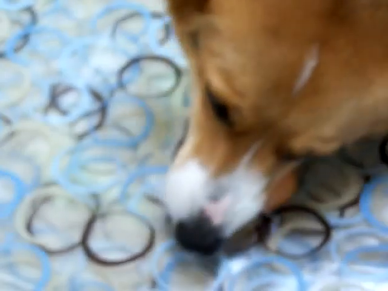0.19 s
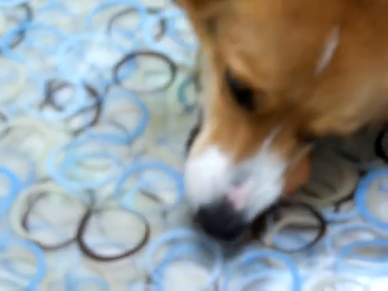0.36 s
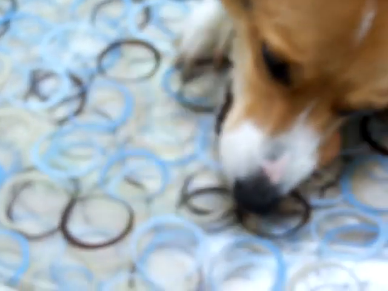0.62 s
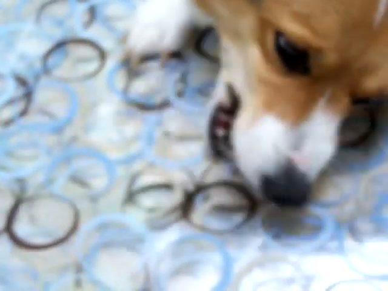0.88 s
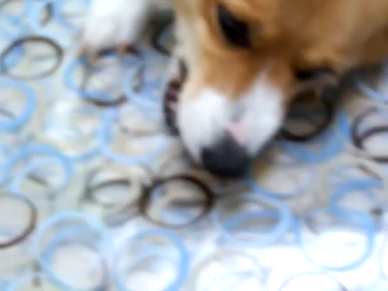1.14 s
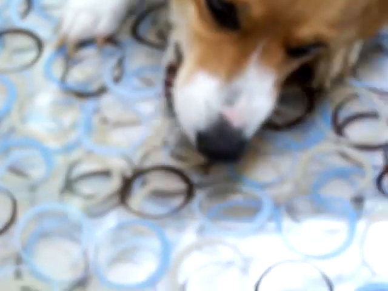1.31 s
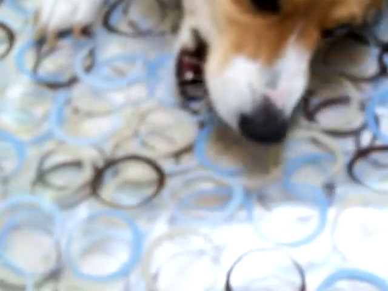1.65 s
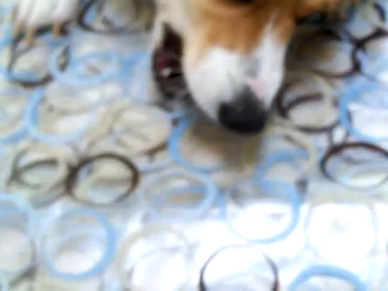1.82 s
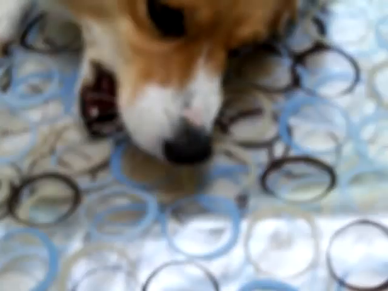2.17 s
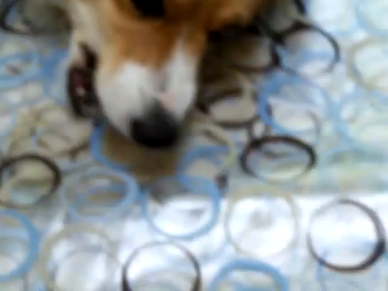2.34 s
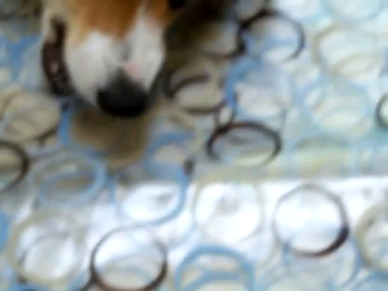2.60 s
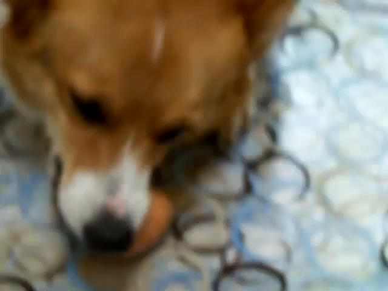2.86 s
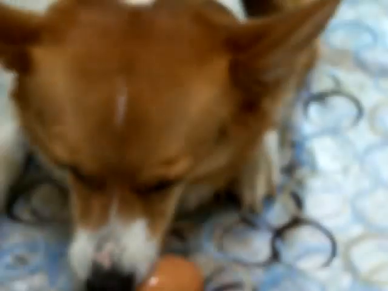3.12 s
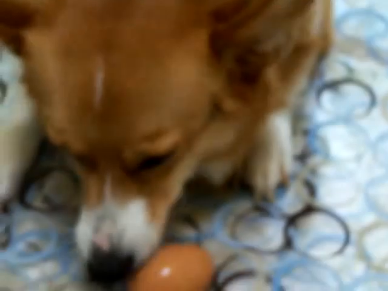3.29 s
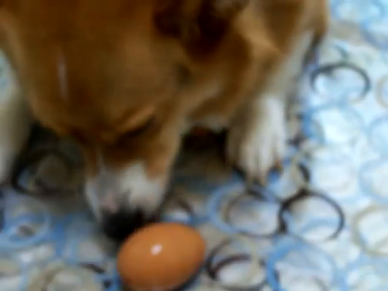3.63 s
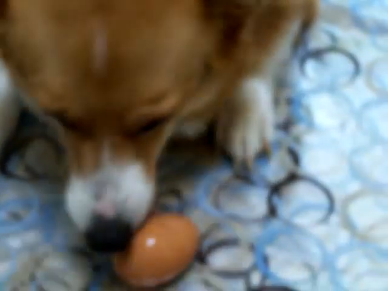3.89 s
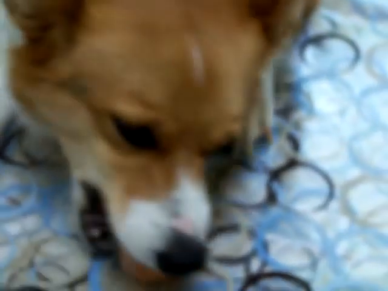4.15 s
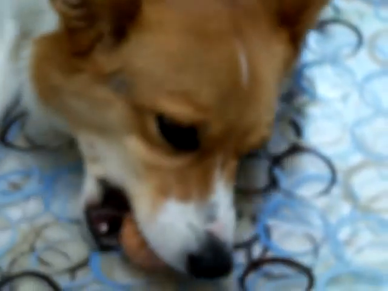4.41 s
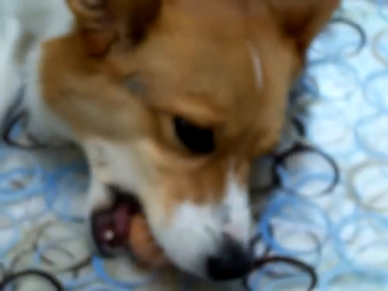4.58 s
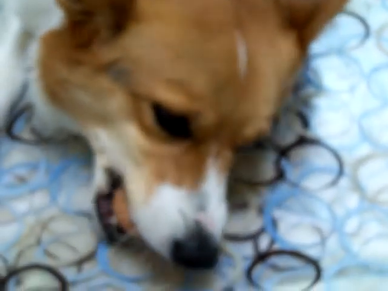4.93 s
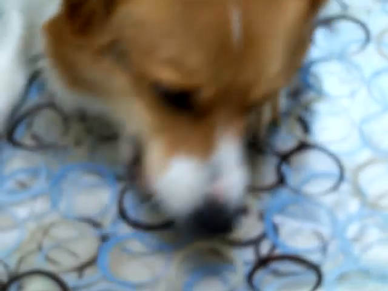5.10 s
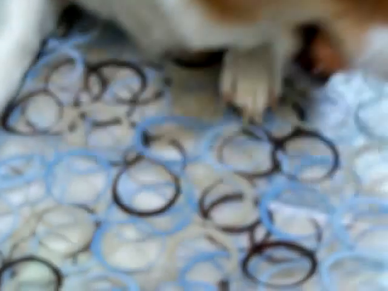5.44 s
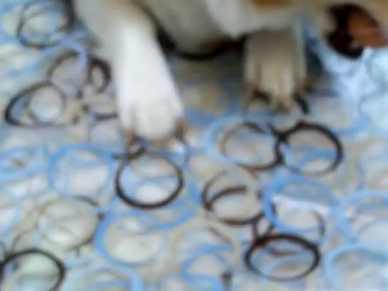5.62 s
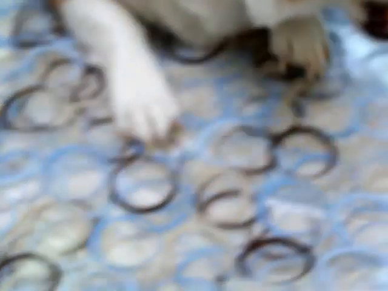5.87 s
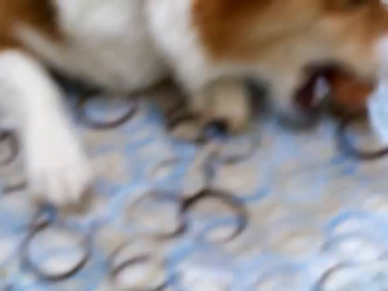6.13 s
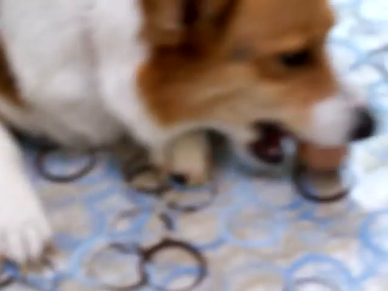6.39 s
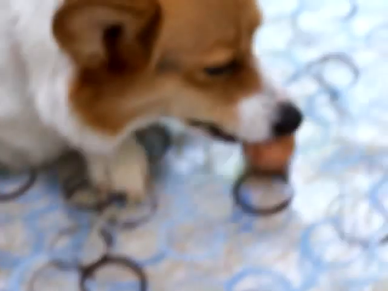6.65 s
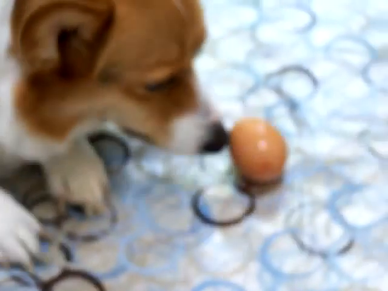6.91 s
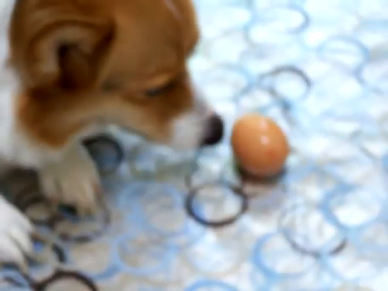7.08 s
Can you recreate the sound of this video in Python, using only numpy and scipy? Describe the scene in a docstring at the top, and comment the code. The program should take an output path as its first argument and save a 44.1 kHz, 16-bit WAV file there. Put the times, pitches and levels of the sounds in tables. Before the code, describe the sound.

In a small, lightly echoing room, a dog mouths an egg close to a phone microphone. Light shell ticks come first, then a cluster of woody floor knocks with tinny collar clinks. A quieter stretch follows, then several more knocks and dry scraping, and finally one very loud, distorted crack of a drop with a quick bouncing tail. Soft fur and mouth rustle, air noise, low appliance hum and a faint whine run underneath.

```python
"""On a vinyl floor in a small room, a dog mouths an egg close to a phone microphone.
Thuds are short wave packets with ringing boards; shell taps are noise bursts in a damped resonance.
Collar tags clink as dying sines and scrape as dense slips; fur, paws and mouth rustle as random grains.
Sparse reflections answer the hits, over air noise, an appliance's drone and hum and a thin whine.
The hardest drop overloads the recorder."""
import sys
import numpy as np
from scipy import signal
from scipy.fft import rfft, irfft, next_fast_len
from scipy.io import wavfile
from scipy.ndimage import uniform_filter1d

SR = 44100
rng = np.random.default_rng(int(sys.argv[2]) if len(sys.argv) > 2 else 0)


def transcribe(signal):
    """Save signal, clipped to [-1, 1], as a 16-bit WAV file at the path in sys.argv[1]."""
    frames = np.atleast_2d(signal).T
    limited = np.clip(frames, -1, 1)
    pcm = np.round(limited * 32767).astype(np.int16)
    wavfile.write(sys.argv[1], SR, pcm)


N = 320149  # length in samples

# Egg and jaw meeting the floor. Each row: start in seconds, blow level in dB, pitch of the blow in Hz.
FLOOR_THUDS = [(.614, -23, 260), (0.912, -18, 300), (1.599, -6, 294), (1.782, -21, 330),
               (1.825, -19.5, 220), (1.941, -1, 325), (2.028, -19.5, 322), (2.091, -8, 312),
               (2.294, -10, 300), (2.328, -18.5, 354), (2.445, -20.5, 223), (2.518, -22.5, 322),
               (2.797, -18.5, 288), (2.957, -18.5, 300), (2.992, -21, 312), (3.164, -21, 318),
               (4.271, -3.5, 296), (4.475, -6, 281), (4.74, -7, 288), (4.751, -19, 250), (5.698, -22, 255),
               (6.252, 7.5, 271), (6.293, -1.5, 274), (6.34, -9.5, 233), (6.408, -30, 350),
               (6.454, -23, 295), (6.601, -19, 272), (6.669, -20, 276)]
# Modes of the floor boards. Each row: frequency in Hz, relative level in dB, t60 in seconds.
BOARD_MODES = [(202, -7, 0.13), (275, -9.5, 0.12), (338, -0.5, 0.035), (420, -0.5, 0.076),
               (491, 2.5, 0.055), (602, -2, 0.04), (793, -19, 0.056)]
# Teeth and floor tapping the shell. Each row: start in seconds, peak in dB, centre in Hz.
SHELL_TAPS = [(0.0547, -18.5, 1300), (0.071, -19.5, 1340), (0.4851, -8, 2700), (0.5364, -16.5, 4320),
              (0.612, -18, 1690), (.6522, -20, 2400), (.889, -21.5, 1240), (0.9078, -25, 1270),
              (1.0076, -16, 1070), (1.067, -20, 3000), (1.14, -10, 2820), (1.317, -32.5, 2510),
              (1.4046, -19.5, 1710), (1.5997, -23, 1720), (1.7325, -31.5, 3130), (1.9403, -12, 1820),
              (2.09, -26, 1260), (2.294, -26, 1190), (2.3247, -19, 1070), (2.459, -29, 3500),
              (2.517, -20.5, 1130), (2.563, -25, 3400), (2.581, -20.5, 3270), (2.9332, -25, 3470),
              (3.461, -28, 3500), (3.8285, -34.5, 7000), (3.9494, -19, 6060), (3.9514, -33, 2380),
              (4.237, -26, 1080), (4.2679, -24, 1370), (4.412, -31, 3560), (4.4445, -31, 4800),
              (4.4747, -30, 1100), (4.738, -29, 1300), (5.583, -24.5, 1490), (5.638, -21, 4300),
              (5.699, -17.5, 2580), (5.706, -17.5, 3680), (6.044, -32.5, 1980), (6.2512, 6, 2440),
              (6.293, -12.5, 1900), (6.943, -21, 2370), (7.0614, -32, 6940), (7.1526, -18, 6200)]
# Collar tags knocking. Each row: start in seconds, level in dB, then tick, upper ring and low ring
# in dB relative to that level.
TAG_CLINKS = [(0.0539, -14.5, -0.5, -11, 0), (0.0722, -16.5, 1.5, 0, 2.5), (0.8862, -25, -15, -6, -20),
              (0.9097, -31, -6, -1, -10), (1.0088, -10.5, 0, -9, -41), (1.1378, -31, -25, -6, -21),
              (1.4082, -30.5, 2.5, -16, -11), (2.0158, -17.5, -9, -16, -30), (2.027, -13, -18, -17, -27),
              (2.0792, -23.5, -2, -12, -34), (2.089, -29, 5, -11, -31), (2.2917, -15, -8, -26, -16),
              (2.3273, -5, -9.5, -6, -29), (2.5166, -13, -7, -14, -34), (2.531, -15, -15, -17, -17),
              (2.7067, -24, -11, -23, -25), (2.9322, -12.5, -15, -19, -25), (3.1624, -19, -8, -9, -13),
              (3.264, -34.5, -3, -5, -23), (3.3917, -37, -9, -17, -28), (3.4604, -22, -7, -18, -32),
              (4.146, -29, -2, -17, -16), (4.237, -19, -3, -25, -29), (4.2683, -15.5, -4.5, -26, -28),
              (4.4726, -6, -8, -17, -36), (4.6952, -29, -12, -1, -25), (4.7286, -25, -3, -10, -30),
              (4.7381, -17.5, -8, -6, -28), (4.7483, -19, 2, -7, -13), (4.794, -18, -13, -13, -13),
              (4.8841, -18.5, 4, -7, -31), (5.6967, -17.5, -3.5, -25, -14), (5.7843, -24.5, -8.5, -13, -6),
              (6.196, -10.5, -19, -28, -40), (6.2517, -5.5, -12, -2, -10), (6.3008, -12, -16, -17, -17),
              (6.317, -17, -14, -14, -19), (6.3356, -15, -4, -8, -12), (6.504, -41, -15, -11, 7),
              (6.531, -36.5, -17, -12, 7.5), (6.601, -26.5, -6, -2, -22), (6.6227, -21.5, -7, 5, -5),
              (6.769, -32.5, -2, -8, -30)]
# Three groups of tag modes. Each row: frequency in Hz, relative level in dB, t60 in seconds.
MAIN_TAG_MODES = [(4758, 5.5, 0.014), (4990, -8, 0.026), (4782, -29, 0.16)]
UPPER_TAG_MODES = [(5865, 4, 0.014), (6370, -14, 0.011), (3563, -14, 0.034)]
LOW_TAG_MODES = [(1327, -3, 0.046), (3217, -11.5, 0.054)]
# Teeth, collar and rolling egg dragging. Each row: start in seconds, end in seconds, grit level in dB rms,
# swell over its length in dB, centre in Hz, tag ring in dB relative to the grit.
DRAGS = [(0.485, 0.56, -39.5, -9, 2500, -24), (0.58, 0.687, -41.5, -15, 2440, -31),
         (0.873, 0.925, -44, -19, 3230, -0.5), (1.131, 1.17, -31, -22, 2300, -30),
         (1.308, 1.352, -43.5, -6, 2460, -23), (2.273, 2.371, -50.5, -2, 4900, 7),
         (2.51, 2.543, -37, -4, 5400, 0.5), (2.765, 2.856, -45.5, -1, 5360, 9),
         (2.87, 2.91, -44.5, -11, 4080, -19), (3.386, 3.447, -48, -15, 6040, -16),
         (3.634, 3.72, -49.5, 7, 4970, -28), (4.796, 4.901, -32.5, 34, 3440, -9),
         (4.844, 4.897, -33, -6, 1100, -32), (4.885, 4.973, -45.5, -11, 3700, -10),
         (5.544, 5.654, -37, 47, 3900, -27), (5.695, 5.718, -31.5, -11, 3530, -33),
         (5.914, 5.957, -44.5, 7, 4930, -8), (5.929, 6.09, -45.5, -13, 3100, -27),
         (6.115, 6.16, -44, -1, 6000, -12), (6.135, 6.222, -45, 4, 5200, 6),
         (6.258, 6.401, -41.5, -5, 1500, -30), (6.261, 6.48, -35.5, -20, 750, -14),
         (6.454, 6.577, -47, 3, 900, -4.5), (6.606, 6.67, -56.5, -14, 5040, 8.5),
         (6.829, 7.043, -47, -4, 3770, -30), (6.926, 6.945, -41.5, 3, 5350, -27)]
# Motion of the dog. Each row: time in seconds, fur and paw rustle in dB, lip and tongue hiss in dB.
DOG_MOTION = [(0.0, -54, -86), (0.36, -54, -83), (0.66, -44.5, -74), (1.09, -51, -66), (1.64, -45.5, -66),
              (2.05, -56.5, -60), (2.34, -50, -58), (2.59, -55, -66), (2.93, -46.5, -63),
              (3.17, -54, -55.5), (4.51, -55.5, -71.5), (4.87, -47.5, -64), (5.05, -57.5, -67),
              (5.62, -53.5, -62), (5.78, -48, -61), (6.05, -52, -60), (6.33, -42.5, -66), (6.7, -54, -58.5),
              (7.26, -56, -63)]
# Spectra of the rustle and of the hiss. Each row: frequency in Hz, relative level in dB.
RUSTLE_SPECTRUM = [(500, -30.5), (900, 1), (1500, -4.5), (2500, 1), (3500, -3), (4500, -8.5), (6000, -16)]
HISS_SPECTRUM = [(3000, -25.5), (4500, -11), (6000, 2.5), (7500, 1), (8200, -20)]
# Decay of the small room. Each row: frequency in Hz, t60 in seconds, relative level in dB.
ROOM_DECAY = [(150, 0.22, 8.5), (400, 0.54, -10), (910, 0.3, 4.5), (3160, 0.37, 4), (5900, 0.37, -2.5)]
# Spectrum of the air noise. Each row: frequency in Hz, relative level in dB.
AIR_SPECTRUM = [(15, -58), (25, -34.5), (48, -10), (70, -16), (85, -22.5), (114, -11), (271, -9),
                (328, -1.5), (398, -14), (644, -17), (726, -21), (1200, -22.5), (2360, -37.5),
                (3550, -30.5), (7860, -38), (10200, -77), (17300, -120)]
# Bands of the appliance's housing. Each row: centre in Hz, width at half amplitude in Hz, level in dB rms.
DRONE_BANDS = [(116.4, 21, -49), (162.9, 13, -47.5), (234, 22, -49), (358, 27, -47), (409, 35, -51.5),
               (640.5, 3.1, -56), (3470, 150, -61.5)]
# Steady tones. Each row: frequency in Hz, level in dB rms.
HUM_TONES = [(59.5, -48.5), (641, -62)]
# Level of a thin whine. Each row: time in seconds, level in dB rms.
WHINE_LEVEL = [(0, -56.5), (.9, -55), (2.2, -58.5), (3.5, -63), (5.2, -62), (7.26, -65)]

# thuds: bass cut; ring and hard edge against the blow, and extra edge for each dB of blow
BASS_HZ, BOARDS_DB, EDGE_DB, EDGE_PER_DB = 185, -9, -5, 0.48
# taps: decay at 2 kHz; sharpness of each resonance for a full-scale tap at 2 kHz
TAP_T60_S, TAP_Q = 0.023, 1.68
SHORTER, SHARPER = 0.31, 0.26  # powers of pitch by which brighter taps shorten and sharpen
DULLER_DB = 0.5  # sharpness lost for each dB of strength: hard taps shake the whole shell
SKIRT_DB, SKIRT_PER_OCTAVE_DB = -3, -8.5  # skirt gain at 2 kHz; brighter taps are purer
TICK_HZ = 4960
DRAG_UPPER_DB, DRAG_LOW_DB = -4, -15  # gains of the upper and low tag modes while dragging
AIR_DB, WHINE_HZ = -39.5, 3210  # air noise in dB rms
MIC_HZ, BAND_LIMIT_HZ = 5830, 8010  # the microphone fades above the first; the recorder stops at the second


def thuds():
    """Impact: a deep swing between two smaller ones, a woody edge, and a shudder exciting the boards."""
    out, t = np.zeros(N), np.arange(SR // 5) / SR
    noises = rng.standard_normal((len(FLOOR_THUDS), SR // 20))
    for (s, db, hz), noise in zip(FLOOR_THUDS, noises):
        turns = hz * t
        blow = -np.cos(2 * np.pi * (turns - 1.2)) * np.exp(-((turns - 1.08) / 0.58) ** 2)
        edge = -np.cos(2 * np.pi * 1.9 * (turns - 1.12)) * 2.46 * turns * np.exp(-1.6 * turns)
        edge_gain = gain_of(EDGE_DB + EDGE_PER_DB * db)  # harder blows have more edge
        shudder = noise * gain_of(-60 * t[:len(noise)] / 0.064)
        boards = signal.fftconvolve(shudder, ring(BOARD_MODES, t))[:len(t)]
        boards = gain_of(BOARDS_DB) * boards / abs(boards).max()
        add(out, s, gain_of(db) * (blow + edge_gain * edge + boards))
    # a small object radiates no deep bass
    return signal.lfilter(*signal.butter(2, BASS_HZ, "high", fs=SR), out)


def taps():
    """Damped resonance: a snap and a crack of noise excite the shell, over a broad duller skirt."""
    out, t = np.zeros(N), np.arange(SR // 12) / SR
    snap = 1.7 * np.exp(-((t - .0003) / .00006) ** 2)
    for (s, db, hz), noise in zip(SHELL_TAPS, rng.standard_normal((len(SHELL_TAPS), SR // 12))):
        pitch = hz / 2000
        crack = noise * gain_of(-60 * t / TAP_T60_S * pitch ** SHORTER) + snap
        q = TAP_Q * pitch ** SHARPER * gain_of(-DULLER_DB * db)
        skirt = double_band(crack, 0.84 * hz, 0.69)
        skirt_gain = gain_of(SKIRT_DB + SKIRT_PER_OCTAVE_DB * np.log2(pitch))
        tap = skirt_gain * skirt + double_band(crack, hz, q)
        add(out, s, gain_of(db) * tap / abs(tap).max())
    return out


def clinks():
    """Modal vibration: a brief chatter tick and ringing tags, a little off pitch as they hang differently."""
    out, t = np.zeros(N), np.arange(SR // 6) / SR
    noises = rng.standard_normal((len(TAG_CLINKS), SR // 6))
    for (s, db, tick_db, upper_db, low_db), noise in zip(TAG_CLINKS, noises):
        chatter = noise * gain_of(-60 * t / 0.026) * (1 - np.exp(-t / 0.001))
        tick = double_band(chatter, TICK_HZ, 1.16)
        tick = gain_of(tick_db) * tick / abs(tick).max()
        tag_time = t * (1 + 0.014 * noise[-1])  # stretched time shifts the pitch
        upper = gain_of(upper_db) * ring(UPPER_TAG_MODES, tag_time, 1.2 * noise[-4:-1, None])
        rings = .5 * ring(MAIN_TAG_MODES, tag_time) + upper
        flutter = 1 + .5 * evened(uniform_filter1d(noise, 90))  # loose tags brush each other while they ring
        rings = rings * flutter * (1 - np.exp(-t / 0.0019))
        low = gain_of(low_db) * ring(LOW_TAG_MODES, tag_time)
        add(out, s, gain_of(db) * (rings + low + tick))
    return out


def scrapes():
    """Friction: dense uneven slips are heard directly as grit and through the ringing tags."""
    slips = grains(4000, 3.3)
    out, t = np.zeros(N), np.arange(SR // 16) / SR
    tags = ring(MAIN_TAG_MODES, t)
    tags = tags + gain_of(DRAG_UPPER_DB) * ring(UPPER_TAG_MODES, t)
    tags = tags + gain_of(DRAG_LOW_DB) * ring(LOW_TAG_MODES, t)
    for s, end, db, swell_db, hz, ring_db in DRAGS:
        part = slips[round(s * SR):round(end * SR)]
        swell = gain_of(swell_db * np.linspace(-.5, .5, len(part)))
        part = part * swell * signal.windows.tukey(len(part), .4)
        grit = evened(double_band(part, hz, 1.0))
        add(out, s, gain_of(db) * grit)
        add(out, s, gain_of(db + ring_db) * evened(signal.fftconvolve(part, tags)))
    return out


def rustle(rustle_db, hiss_db):
    """Granular noise: dense small grains of fur and claws on vinyl, and finer ones of lips and tongue."""
    fur = coloured(grains(5000, 4.6), RUSTLE_SPECTRUM)
    lips = coloured(grains(4000, 2.5), HISS_SPECTRUM)
    return gain_of(rustle_db) * fur + gain_of(hiss_db) * lips


def room(x):
    """Reverberation: sparse reflections of random sign, each band dying at its own speed."""
    tail = np.zeros(SR // 2)
    at = np.arange(260, SR // 2 - 20, 20)  # one reflection in every 20 samples
    tail[at + rng.integers(0, 20, len(at))] = rng.choice([-1., 1.], len(at))
    hz, t, z = signal.stft(tail, SR, nperseg=256)
    f, t60, db = np.transpose(ROOM_DECAY)
    shape_db = np.interp(hz, f, db)[:, None] - 60 * t / np.interp(hz, f, t60)[:, None]
    tail = signal.istft(z * gain_of(shape_db), SR, nperseg=256)[1]
    return signal.fftconvolve(x, tail / np.linalg.norm(tail))[:N]


def room_tone():
    """Stationary noise and tones: air, narrow wavering bands of a motor housing, hum and a whine."""
    t, hz = np.arange(N) / SR, np.fft.rfftfreq(N, 1 / SR)
    air = gain_of(AIR_DB) * coloured(rng.standard_normal(N), AIR_SPECTRUM)
    noise_spectrum = rfft(rng.standard_normal(N))
    drone = np.zeros(N)
    for f, width, db in DRONE_BANDS:
        resonance = 1 / (1 + ((hz - f) / width * 2) ** 2)
        drone += gain_of(db) * evened(irfft(noise_spectrum * resonance, N))
    # the root of two turns rms into the peak of a sine
    hum = sum(np.sqrt(2) * gain_of(db) * np.sin(2 * np.pi * f * t) for f, db in HUM_TONES)
    whine_gain = np.sqrt(2) * gain_of(np.interp(t, *np.transpose(WHINE_LEVEL)))
    whine = whine_gain * np.sin(2 * np.pi * WHINE_HZ * t)
    return air + drone + hum + whine


def ring(modes, t, sway=0):
    """Modal decay: dying sines of a struck object; sway shifts each mode's level in dB."""
    hz, db, t60 = np.transpose(modes)[:, :, None]
    decay = gain_of(db + sway - 60 * t / np.maximum(t60, .003))
    return (decay * np.sin(2 * np.pi * hz * t)).sum(0)


def grains(per_s, spread_db):
    """Random impulses: sparse clicks of random sign, a few of them large."""
    size = gain_of(spread_db * np.minimum(rng.exponential(1, N), 4))
    return size * rng.choice([-1., 1.], N) * (rng.random(N) < per_s / SR)


def double_band(x, hz, q):
    """Resonance: two equal resonators in series."""
    peak = signal.iirpeak(hz, q, SR)
    return signal.lfilter(*peak, signal.lfilter(*peak, x))


def coloured(x, spectrum):
    """Spectral shaping: weights the frequencies of x by a table, then scales to rms 1."""
    size = next_fast_len(N)
    weight = gain_of(read(spectrum, np.fft.rfftfreq(size, 1 / SR)))
    return evened(irfft(rfft(x, size) * weight, size)[:N])


def read(points, hz):
    """Interpolation: reads a table on a log-frequency axis."""
    f, value = np.transpose(points)
    return np.interp(np.log(hz + 1), np.log(f + 1), value)


def gain_of(db):
    """Decibel scale: turns decibels into amplitude gain."""
    return 10 ** (np.asarray(db) / 20)


def evened(x):
    """Normalisation: scales to rms 1."""
    return x / np.sqrt(np.mean(x ** 2) + 1e-20)


def add(mix, s, sound):
    """Superposition: adds a sound to the mix at time s in seconds."""
    part = mix[round(s * SR):][:len(sound)]
    part += sound[:len(part)]


def scene():
    """Superposition: hits with their room tail over the rustle and the room tone."""
    s, *levels = np.transpose(DOG_MOTION)
    rustle_db, hiss_db = (np.interp(np.arange(N) / SR, s, level) for level in levels)
    low, shell, metal, drag = thuds(), taps(), clinks(), scrapes()
    sent = gain_of(-7.5) * low + gain_of(-9.0) * shell + gain_of(-9.5) * metal + gain_of(-13) * drag
    wet = room(sent)
    return (low + shell + metal + drag + wet + rustle(rustle_db, hiss_db) + room_tone())[None]


def record(dry):
    """Transducer limits: treble fade of the microphone, hard overload at full scale, then the band limit."""
    faded = signal.lfilter(*signal.butter(2, MIC_HZ, fs=SR), dry)
    clipped = np.clip(faded, -1, 1)
    band_limit = signal.firwin(255, BAND_LIMIT_HZ, window=("kaiser", 9), fs=SR)
    return signal.oaconvolve(clipped, band_limit[None], "same")


dry = scene()
out = record(dry)
transcribe(out)
```